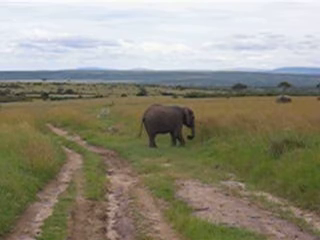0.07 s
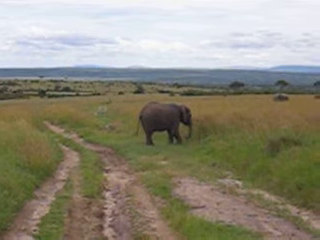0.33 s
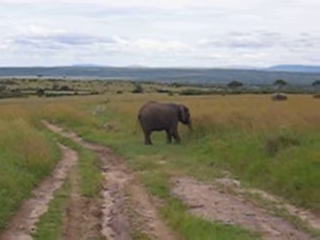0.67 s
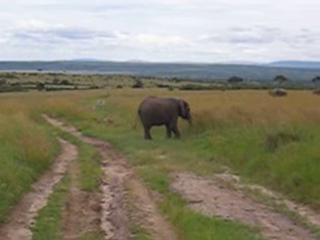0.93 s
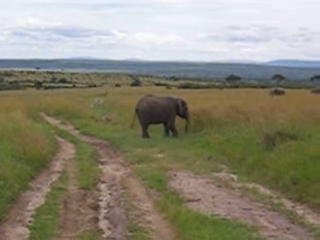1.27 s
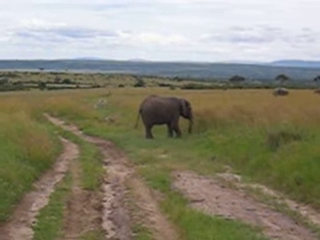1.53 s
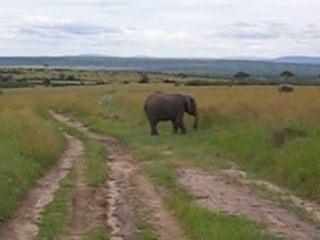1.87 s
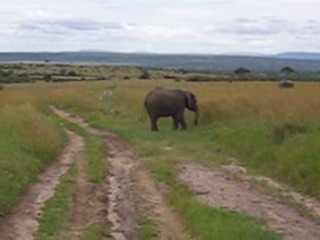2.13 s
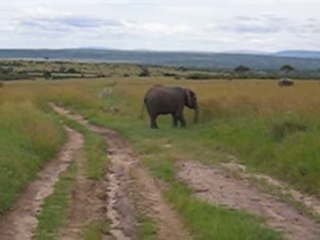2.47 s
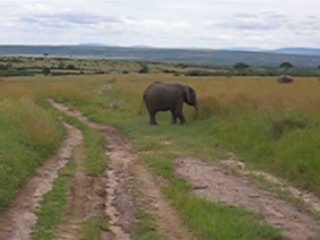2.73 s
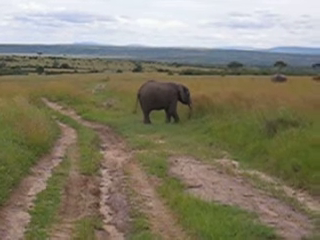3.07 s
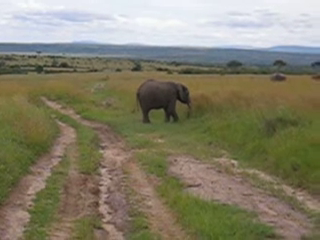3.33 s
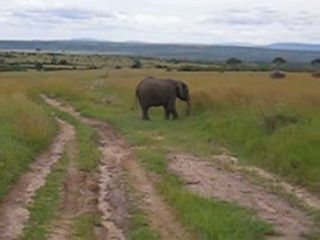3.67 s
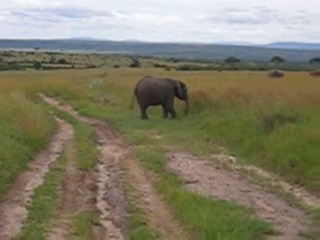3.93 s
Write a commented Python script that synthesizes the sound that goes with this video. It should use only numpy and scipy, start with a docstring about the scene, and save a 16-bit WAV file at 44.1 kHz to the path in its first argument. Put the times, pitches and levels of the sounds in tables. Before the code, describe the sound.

Soft, uneven wind buffets the microphone on an open plain, with steady hiss and a faint electronic whine. After a sharp pop, the camera ticks four times in the hand; late on, a faraway bird gives four faint whistles.

```python
"""A sharp pop as a small hand-held camera's microphone wakes, then coarse hiss and open grassland.
A light breeze rumbles on the microphone and its eddies bump the diaphragm, hardest near the end.
The camera ticks four times in the hand: a button, a small clink, two finger knocks.
Its electronics whine faintly, and late on a far bird whistles four arched notes."""
import sys
import numpy as np
from scipy import signal
from scipy.fft import rfft, irfft, next_fast_len
from scipy.io import wavfile
from scipy.ndimage import map_coordinates

SR = 44100
rng = np.random.default_rng(int(sys.argv[2]) if len(sys.argv) > 2 else 0)


def file_out(sig):
    """Save sig as 16-bit WAV at sys.argv[1]."""
    # one column per channel
    cols = np.atleast_2d(sig).T
    # limit, then scale
    lim = np.clip(cols, -1, 1)
    pcm = np.round(lim * 32767).astype(np.int16)
    wavfile.write(sys.argv[1], SR, pcm)


N = 176400

# bed of steady air and microphone hiss (frequency [Hz], relative density [dB])
AIR_SPECTRUM = [(25, 13), (60, 6), (150, 5), (300, 3), (550, -.5), (1000, -3.5), (2000, -6.5), (2900, -6.5),
                (3400, -9.5), (5400, -12)]
AIR_DB, OFFSET_DRIFT_DB = -52.5, -44
# thin tones of the electronics (frequency [Hz], rms level [dB])
WHINE_TONES = [(948, -76.5), (1816, -77), (2465, -76.5), (3105, -79), (4280, -65.5), (4710, -72.5),
               (4927, -76.5)]

# the far bird's notes (time [s], length [s], top pitch [Hz], rise to the top [Hz], level [dB])
BIRD_NOTES = [(2.739, .095, 2849, 260.5, -52.5), (2.883, .122, 2996, 480, -57),
              (3.05, .19, 2974, 419.5, -65), (3.95, .1, 2562, 50, -50)]
ARCH_TOP = .58  # share of a note's length at which its pitch crests
QUAVER_DB, QUAVER_HZ, QUAVER_PER_S = 2.5, 18, 55
BIRD_TAIL_DB, BIRD_TAIL_T60 = -9.5, .43

# ring of a small hard part (frequency [Hz], relative level [dB], t60 [s])
SMALL_PART_MODES = [(2313, -22, .25), (2673, 0, 0.014), (3120, 2, .035), (3660, -5.5, .022),
                    (4620, -15.5, 0.011)]
CLINK_S, CLINK_DB = .9712, -38
# the button's double contact (time [s], click level [dB], snap level [dB])
BUTTON_CONTACTS = [(.2343, -33, -19), (0.2365, -26, -36)]
# ring of the button and its plastic panel (frequency [Hz], relative level [dB], t60 [s])
PANEL_MODES = [(300, -9.5, .012), (760, -9, .03), (1005, -2, .038), (1170, -2, .022), (1390, -2, .025),
               (1713, -11, .012), (2560, 0, 0.019), (2894, -28, .25), (3710, 0, .007), (4260, -1, .007)]
SNAP_HZ, SNAP_T60 = 5006, .0059
# soft finger knocks (time [s], level [dB], brightness [Hz])
FINGER_KNOCKS = [(1.452, -38, 2800), (1.6850, -30, 800)]
# ring of the housing (frequency [Hz], relative level [dB], t60 [s])
HOUSING_MODES = [(395.4, -8, 0.057), (662.5, -1, 0.022), (921, -2, .036), (1610, 1, .015),
                 (1935, -6, 0.019), (2904, 1, 0.014), (4100, -0.5, .008)]
CRACK_DB, CRACK_T60 = -2, .011

# swells of the breeze at the microphone (time [s], level [dB])
WIND_SWELLS = [(.08, -48), (.33, -43), (0.401, -35), (.57, -35), (.66, -41), (.80, -41), (1.001, -46),
               (1.201, -52), (1.35, -40), (1.42, -49), (1.53, -44.5), (1.6, -49), (1.78, -40), (2.03, -56),
               (2.139, -45), (2.259, -57), (2.98, -60), (3.12, -39), (3.28, -57.5), (3.4, -51.5),
               (3.46, -41), (3.53, -48), (3.66, -35), (3.771, -28), (3.82, -39), (3.91, -30.5), (4.0, -40)]
# colour of the rumble at the usual wind level (frequency [Hz], relative density [dB])
RUMBLE_SPECTRUM = [(8, -7), (20, -1), (38, 0.5), (70, -9), (120, -18), (200, -31), (400, -59), (900, -87)]
USUAL_WIND_DB, OCTAVES_PER_DB = -42, .01
# single eddies that bump the microphone (time [s], peak level [dB], nominal pitch [Hz])
EDDY_BUMPS = [(0.162, -35.5, 71), (.397, -27.5, 39.96), (0.434, -33, 74.8), (0.469, -30.5, 65.8),
              (.522, -29.5, 83.7), (.583, -29.5, 76), (.770, -32.5, 70.7), (.945, -36, 74.8),
              (1.035, -38.5, 84.4), (1.351, -30.5, 37.75), (2.131, -34, 55), (2.16, -40, 110),
              (3.092, -29.5, 65.2), (3.112, -25.5, 85.9), (3.126, -28, 42.26), (3.455, -33.5, 59.4),
              (3.673, -26.5, 54.7), (3.698, -30, 111.2), (3.719, -24, 194), (3.730, -20.5, 116),
              (3.748, -21.5, 110.8), (3.764, -21, 40.3), (3.842, -30, 85.2), (3.937, -22, 138.5),
              (3.947, -24, 65.6)]
EDDY_SCATTER = .08  # spread of pitch, natural log

# the camera's dull top end (frequency [Hz], gain [dB])
TREBLE_ROLL_OFF = [(20, 2.5), (4900, 0), (5400, -2), (5700, -10), (5950, -20), (6250, -43.5)]
WAKE_S, POP_DB, POP_DECAY_S = .0725, -21.5, .0055
STEP_DB = -45  # one step of the coarse converter
INPUT_TOP_HZ, OUTPUT_TOP_HZ = 6350, 16300


def amp(db):
    """Decibels to gain."""
    return 10 ** (np.asarray(db) / 20)


def unit(x):
    """Scale to rms 1."""
    return x / np.sqrt(np.mean(x ** 2) + 1e-20)


def along(points, hz):
    """Read a curve of (frequency [Hz], value) points on a log axis."""
    point_hz, values = np.transpose(points)
    return np.interp(np.log(hz + 1), np.log(point_hz + 1), values)


def clock():
    """The time of every sample, in seconds."""
    return np.arange(N) / SR


def wobble(rate):
    """A smooth random curve, rate knots a second."""
    knots = rng.standard_normal(int(N * rate / SR) + 4)
    return map_coordinates(knots, [clock() * rate])


def filtered(x, response):
    """Equalise x with a gain given as a function of frequency."""
    size = next_fast_len(len(x) + SR // 2)
    return irfft(rfft(x, size) * response(np.fft.rfftfreq(size, 1 / SR)), size)[:len(x)]


def noise(spectrum, size):
    """Coloured noise of rms 1."""
    return unit(filtered(rng.standard_normal(size), lambda hz: amp(along(spectrum, hz))))


def air():
    """A bed of steady air and hiss over a slow, inaudible drift of the recorder's DC offset."""
    return amp(AIR_DB) * noise(AIR_SPECTRUM, size=N) + amp(OFFSET_DRIFT_DB) * wobble(3)


def whine(drift_rad=.25):
    """The electronics sing in thin tones, each drifting a little in phase."""
    return sum(amp(db) * np.sqrt(2) * np.sin(2 * np.pi * hz * clock() + drift_rad * wobble(6))
               for hz, db in WHINE_TONES)


def bird():
    """Arched, slightly quavering whistles, smeared by the distance."""
    song = np.zeros(N)
    for start, length, top_hz, rise_hz, db in BIRD_NOTES:
        progress = np.clip((clock() - start) / length, 0, 1)
        arch_hz = top_hz - rise_hz * ((progress - ARCH_TOP) / ARCH_TOP) ** 2
        hz = arch_hz + QUAVER_HZ * wobble(QUAVER_PER_S)
        envelope = amp(db + QUAVER_DB * wobble(QUAVER_PER_S)) * np.abs(np.sin(np.pi * progress)) ** .6
        song += envelope * np.sin(2 * np.pi * np.cumsum(hz) / SR)
    t = np.arange(SR // 2) / SR
    tail = rng.standard_normal(len(t)) * amp(-60 * t / BIRD_TAIL_T60)
    return song + amp(BIRD_TAIL_DB) * signal.fftconvolve(song, tail / np.linalg.norm(tail))[:N]


def ring(modes, start, bright_hz, scatter_db=2.5, attack_s=.00028):
    """A struck part rings in damped modes; a soft contact barely wakes the high ones."""
    span = slice(int(start * SR), int(start * SR) + SR // 4)
    t = np.maximum(clock()[span] - start, 0)[:, None]
    hz, db, t60 = np.transpose(modes)
    gain = amp(db + scatter_db * rng.standard_normal(len(hz))) / np.hypot(1, hz / bright_hz)
    envelope = (1 - np.exp(-t / attack_s)) * amp(-60 * t / t60)
    out = np.zeros(N)
    out[span] = (gain * envelope * np.sin(2 * np.pi * hz * t)).sum(1)
    return out


def crack(start, bright_hz):
    """The noisy edge of a contact: a brief burst, softened above bright_hz."""
    t = clock() - start
    burst = (t > 0) * amp(CRACK_DB - 60 * np.abs(t) / CRACK_T60) * rng.standard_normal(N)
    return filtered(burst, lambda hz: 1 / (1 + 1j * hz / bright_hz))


def handling():
    """A small part clinks, a button clicks with a bright snap, fingers knock on the housing."""
    out = amp(CLINK_DB) * ring(SMALL_PART_MODES, CLINK_S, bright_hz=8000)
    for start, db, snap_db in BUTTON_CONTACTS:
        out += amp(db) * (ring(PANEL_MODES, start, bright_hz=8000) + crack(start, bright_hz=3000))
        out += ring([(SNAP_HZ, snap_db, SNAP_T60)], start, bright_hz=9000)
    for start, db, bright_hz in FINGER_KNOCKS:
        out += amp(db) * (ring(HOUSING_MODES, start, bright_hz) + crack(start, bright_hz))
    return out


def wind():
    """Turbulence rumbles on the microphone, fluttering faster and louder as the breeze swells."""
    level_db = np.interp(clock(), *np.transpose(WIND_SWELLS))
    speed = 2 ** np.clip(OCTAVES_PER_DB * (level_db - USUAL_WIND_DB), -1, 1)
    rumble = noise(RUMBLE_SPECTRUM, size=2 * N)
    flutter = np.interp(np.cumsum(speed), np.arange(2 * N), rumble)
    return amp(level_db) * unit(flutter)


def eddies():
    """Each passing eddy pushes, then pulls on the diaphragm; small ones sound higher."""
    out = np.zeros(N)
    for centre, db, nominal_hz in EDDY_BUMPS:
        hz = nominal_hz * np.exp(EDDY_SCATTER * rng.standard_normal(2)[0])
        phase = 2 * np.pi * hz * (clock() - centre)
        push_pull = -phase / (1 + (phase / 3.2) ** 2) ** 5.5
        out += amp(db) * push_pull / np.abs(push_pull).max()
    return out


def scene():
    """The mono mix at the camera's input."""
    return (air() + wind() + eddies() + handling() + bird() + whine())[None]


def record(dry):
    """The camera wakes with a pop; its slow, coarse converter adds grit and loses the treble."""
    t = clock() - WAKE_S
    awake = t > 0
    quarter_rate = signal.resample_poly(awake * dry[0], 1, 4, window=("kaiser", 3))
    stepped = np.round(quarter_rate / amp(STEP_DB)) * amp(STEP_DB)
    full_rate = np.kron(stepped, [4, 0, 0, 0])[:N]  # zeros between samples mirror the spectrum upward
    dull = filtered(full_rate, lambda hz: amp(along(TREBLE_ROLL_OFF, hz)) * (hz < INPUT_TOP_HZ))
    pop = amp(POP_DB) * awake * np.exp(-np.abs(t) / POP_DECAY_S)
    return filtered(dull + pop, lambda hz: hz < OUTPUT_TOP_HZ)[None]


dry = scene()
out = record(dry)
file_out(out)
```